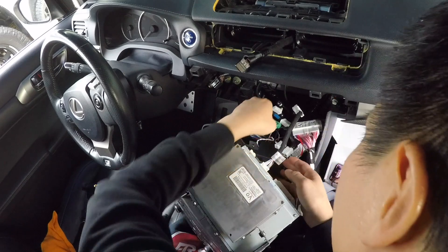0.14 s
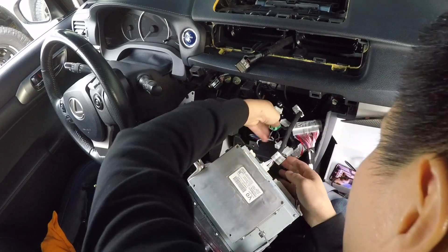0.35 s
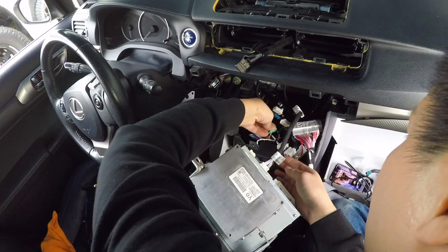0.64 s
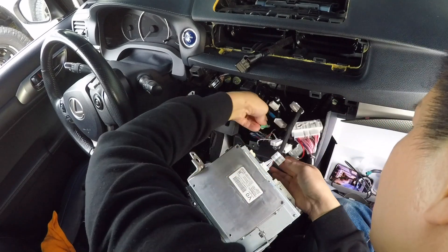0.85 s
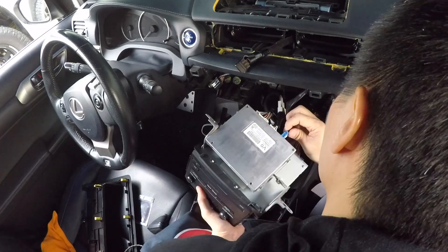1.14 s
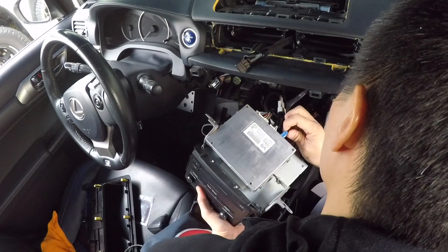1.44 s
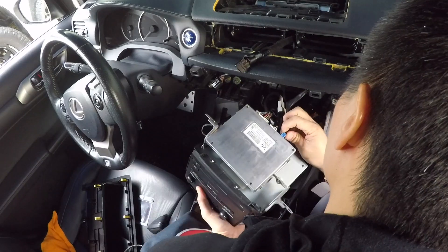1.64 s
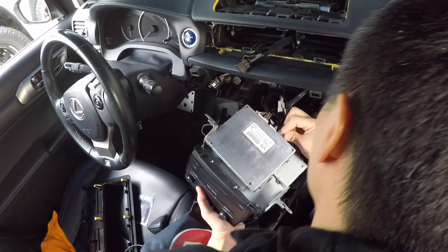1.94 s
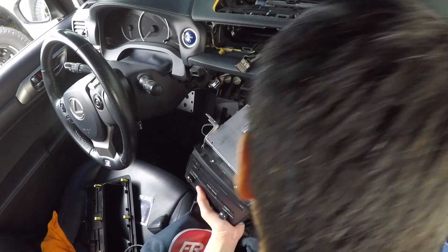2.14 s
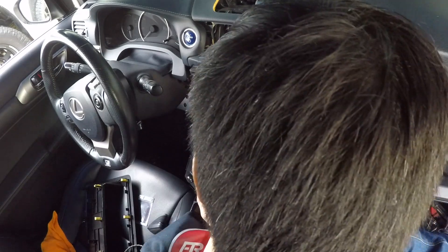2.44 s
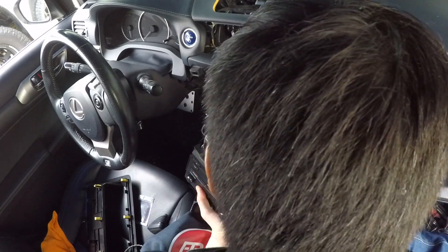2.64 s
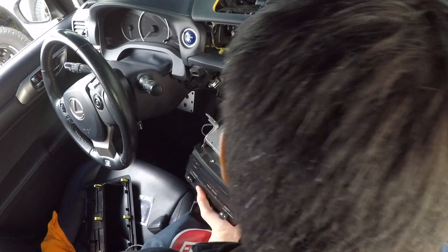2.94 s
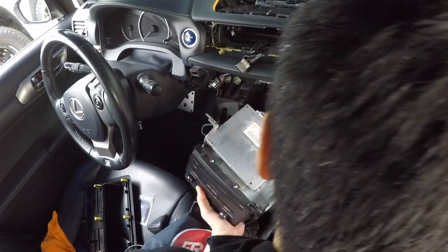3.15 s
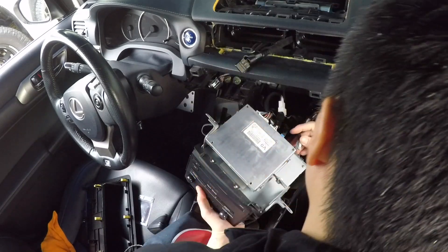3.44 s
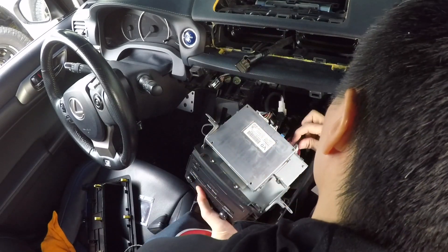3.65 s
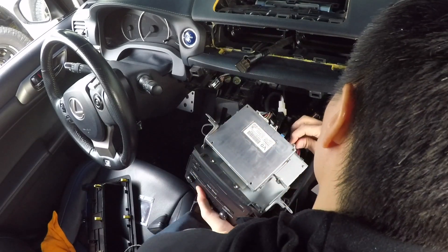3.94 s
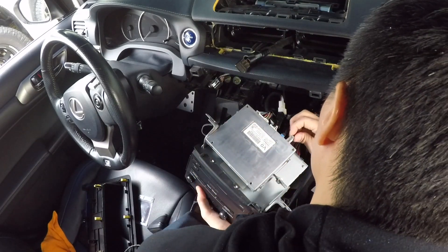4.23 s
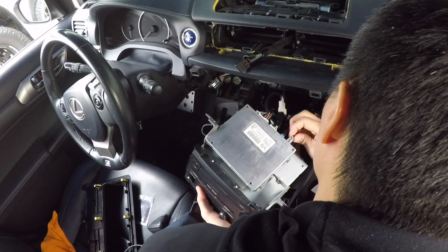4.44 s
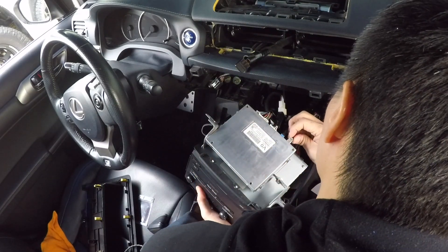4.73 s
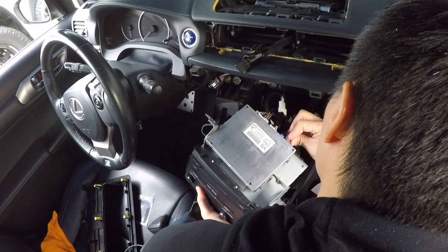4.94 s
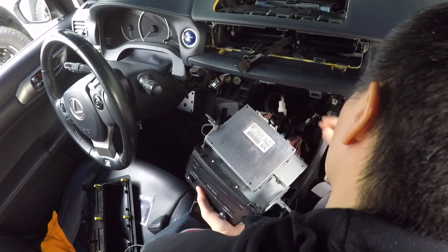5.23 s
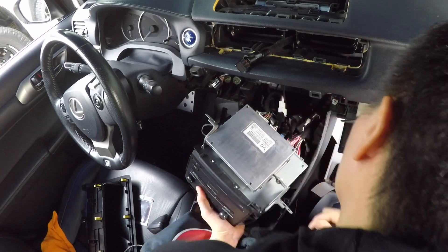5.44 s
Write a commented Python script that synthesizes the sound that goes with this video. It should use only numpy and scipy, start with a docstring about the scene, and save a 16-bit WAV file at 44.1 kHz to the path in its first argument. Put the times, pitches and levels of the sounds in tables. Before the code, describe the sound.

Plastic connector latches snap sharply into a metal electronics case that rings faintly, with scrapes, knocks and cloth rustle in a quiet car cabin.

```python
"""Latches snap and set a sheet-metal case ringing, the case knocks and scrapes, sleeves and cables rustle.
Hands are plugging plastic connectors into an electronics case inside a parked car, over a quiet low
background, in a small padded cabin, heard through a close pair of microphones.
Snaps and hisses are shaped noise, rings are decaying sines, and a dense noise tail echoes the handling."""
import sys
import numpy as np
from scipy import signal
from scipy.fft import rfft, irfft
from scipy.io import wavfile
from scipy.ndimage import uniform_filter1d

SR = 44100
rng = np.random.default_rng(int(sys.argv[2]) if len(sys.argv) > 2 else 0)


def put_to_file(sound):
    """Save the sound as 16-bit audio at rate SR, in the file named by the first command-line argument."""
    columns = np.atleast_2d(sound).T  # one column per channel
    safe = np.clip(columns, -1, 1)
    whole_steps = np.round(safe * 32767)
    wavfile.write(sys.argv[1], SR, whole_steps.astype(np.int16))


def volts_from_db(level):
    """Convert decibel levels to linear amplitude ratios."""
    exponent = np.asarray(level, float) / 20
    return 10 ** exponent


N = 245763  # length in samples


def evened(x):
    """Scales to rms 1."""
    return x / np.sqrt(np.mean(x ** 2) + 1e-20)


def read(points, hz):
    """Reads a table at the frequencies hz, straight between points on a log frequency axis."""
    f, value = np.transpose(points)
    return np.interp(np.log(hz + 1), np.log(f + 1), value)


def add(mix, start_s, sound, pan_db=0):
    """Places a sound in both channels; positive pan_db leans left."""
    part = mix[:, round(start_s * SR):][:, :sound.shape[-1]]
    part += sound[..., :part.shape[1]] * volts_from_db(np.array([[pan_db / 2], [-pan_db / 2]]))


def ring(modes, weights, size):
    """Decaying sines; weights scale each mode and set its sign."""
    t = np.arange(size) / SR
    return sum(weight * volts_from_db(db - 60 * t / t60) * np.sin(2 * np.pi * hz * t)
               for (hz, db, t60), weight in zip(modes, weights))


def wobble(size, seconds):
    """Slow random curve of rms 1, from noise through a one-pole smoother."""
    settled = signal.lfilter([1], [1, -np.exp(-1 / (seconds * SR))], rng.standard_normal(size + SR))[SR:]
    return evened(settled)


# how far the two microphones differ at each pitch: [pitch_hz, side_over_mid_db]
MIC_DIFFERENCE = [(60, -37.5), (150, -18), (380, -19), (950, -11), (2380, -5), (5980, 2), (15000, 0)]


def pair(a, b, hz):
    """Two channels from spectra a and b, alike in the bass and apart in the treble."""
    side = b * volts_from_db(read(MIC_DIFFERENCE, hz))
    return np.array([a + side, a - side])


def noise(spectrum, patchy_db, flicker_db):
    """Stereo noise in short frames with random patches and a flicker shared by all bands; mid rms 1."""
    frames = N // 128 + 6
    a, b, c, d, patches = rng.standard_normal((frames, 257, 5)).T
    patches = evened(uniform_filter1d(uniform_filter1d(patches, 16, 0), 10, 1))
    flicker = evened(uniform_filter1d(rng.standard_normal(frames), 6))
    z = np.array([a + 1j * b, c + 1j * d]) * volts_from_db(patchy_db * patches + flicker_db * flicker)
    white = signal.istft(z, nperseg=512, noverlap=384)[1][:, :N]
    hz = np.fft.rfftfreq(N, 1 / SR)
    x = irfft(pair(*(rfft(white) * volts_from_db(read(spectrum, hz))), hz), N)
    return x / np.std(x.mean(0))


# low background of the car: [pitch_hz, relative level_db per Hz]
BACKGROUND = [(18, -30), (30, 0), (48, -7), (111, -8), (178, -17.5), (361, -21), (457, -27.5), (928, -27.5),
              (1210, -30), (5360, -41.5), (7950, -41.5), (12700, -44), (15700, -53.5)]
BACKGROUND_DB = -59


def background():
    """Steady low noise with a slight flicker."""
    return volts_from_db(BACKGROUND_DB) * noise(BACKGROUND, patchy_db=0.16, flicker_db=2.5)


# levels of cloth and hands: [start_s, cloth and cable hiss level_db, muffled handling level_db]
RUSTLE_LEVELS = [(0.0, -60, -62.5), (0.28, -67, -61), (0.46, -68.5, -60.5), (0.71, -63.5, -62),
                 (0.91, -64, -59), (1.68, -71, -68), (1.92, -64, -65.5), (2.65, -67.5, -57.5),
                 (2.79, -66, -66.5), (2.95, -70.5, -69), (3.5, -71, -67.5), (3.79, -61.5, -67),
                 (3.94, -83, -70), (4.16, -78.5, -71.5), (4.67, -69.5, -67), (5.24, -67, -64.5),
                 (5.37, -59, -63), (5.57, -69, -69)]
# colour of cloth and cables: [pitch_hz, relative level_db per Hz]
CLOTH_COLOUR = [(880, -22), (1500, -4.5), (2220, -1.5), (3220, -5), (3450, -7.5), (9650, -3.5),
                (15600, -17.5)]
# colour of hands on the case: [pitch_hz, relative level_db per Hz]
HANDLING_COLOUR = [(35, -24.5), (60, 8.5), (140, -14), (306, -1.5), (440, -11.5), (532, -7), (1500, -18),
                   (1950, -44.5), (3300, -120)]
SLIPS_PER_S, SLIP_DECAY_S = 120, 0.013


def rustle():
    """Cloth and cables hiss and crackle; hands on the case make a muffled rumble."""
    start_s, hiss_db, rumble_db = np.transpose(RUSTLE_LEVELS)
    t = np.arange(N) / SR
    slips = (rng.random(N) < SLIPS_PER_S / SR) * volts_from_db(1.7 * np.minimum(rng.exponential(1, N), 4))
    # each fibre slip flares and dies
    crackle = 1 + 0.18 * signal.lfilter([1], [1, -np.exp(-1 / (SLIP_DECAY_S * SR))], slips)
    cloth = evened(crackle * noise(CLOTH_COLOUR, patchy_db=4.5, flicker_db=-2.0))
    handling = noise(HANDLING_COLOUR, patchy_db=1.0, flicker_db=2.5)
    return volts_from_db(np.interp(t, start_s, hiss_db)) * cloth + volts_from_db(np.interp(t, start_s, rumble_db)) * handling


# resonances of the rubbed metal: [pitch_hz, width_hz, relative level_db]
SCRAPED_MODES = [(922, 48, -1), (1650, 20, 1), (2770, 126, -8), (3595, 59, -4.5), (3856, 40, 2),
                 (5270, 240, -6.5), (9260, 110, -4.5), (11700, 64, -4.5), (12700, 67, -17),
                 (13300, 83, -24), (13600, 130, -36), (15000, 62, -20)]
# the drag starts, bites, lets go, settles, stops; levels are relative to an rms of 2
SCRAPE_S = (0, 0.13, 0.275, 0.3, 0.45)
SCRAPE_DB = (-87, -62.5, -57, -66.5, -71)
WAVER_DB, WAVER_S = 2.5, 0.036  # each rubbed resonance comes and goes; depth before smoothing


def scrape():
    """Fine friction drives the resonances of the rubbed metal over a diffuse hiss."""
    t = np.arange(0, 0.47, 1 / SR)
    roughness = evened(uniform_filter1d(rng.standard_normal(len(t)), 200))
    grit = rng.standard_normal((2, len(t))) * volts_from_db(2 * roughness)
    hz = np.fft.rfftfreq(len(t), 1 / SR)
    body = volts_from_db(-22) * rfft(grit)  # the diffuse hiss
    for mode_hz, width_hz, db in SCRAPED_MODES:
        waver_db = WAVER_DB * uniform_filter1d(wobble(len(t), WAVER_S), size=400)
        body = body + rfft(grit * volts_from_db(db + waver_db)) / (1 + 1j * (hz - mode_hz) / width_hz)
    drag = volts_from_db(np.interp(t, SCRAPE_S, SCRAPE_DB, right=-99))
    out = np.zeros((2, N))
    add(out, 0, drag * 2 * evened(irfft(pair(*body, hz), len(t))))
    return out


# colour of cracking plastic: [pitch_hz, relative level_db per Hz]
CRACK_COLOUR = [(400, -29.5), (1200, -11), (1800, 5.5), (3000, 1), (6000, -2), (10000, -1.5), (13000, -4),
                (16500, -7)]


def burst(grit, centre_hz, width):
    """Stereo plastic noise with a peak at centre_hz over the crack colour; mid rms 1."""
    size = grit.shape[1]
    hz = np.fft.rfftfreq(size, 1 / SR)
    colour = volts_from_db(read(CRACK_COLOUR, hz)) * (0.19 + 1 / (1 + ((hz / centre_hz - 1) / width) ** 2))
    x = irfft(pair(*(rfft(grit) * colour * [[1], [0.6]]), hz), size)
    return x / np.std(x.mean(0))


# modes of the sheet-metal case: [pitch_hz, relative level_db, t60_s]
CASE_MODES = [(490, -15, 0.24), (522.4, -12.5, 0.21), (777, -16, 0.17), (874, -8, 0.17), (930, -14, 0.16),
              (1306, -17.5, 0.23), (1676, -15, 0.41), (1870, -11, 0.44), (1966, -5.5, 0.22),
              (2070, -20.5, 0.31), (2155, -14, 0.35), (2330, -4, 0.083), (2519, -12.5, 0.268),
              (2595, -13, 0.17), (2690, -19, 0.45), (3171, -25, .25), (3440, -22, .12),
              (3480, -16.5, 0.316), (3590, -27, .22), (4060, -11, .2), (4300, -6, 0.081), (5200, -22, 0.21)]
CASE_OCTAVES = np.log2(np.transpose(CASE_MODES)[0] / 1900)  # pitch in octaves from 1900 Hz
BUZZ, BUZZ_S = 0.25, 0.013  # share of roughness, grain in s


def case_ring(weights, size):
    """The sheet metal rings in its modes; loose brackets roughen the ring."""
    return ring(CASE_MODES, weights, size) * (1 - BUZZ + BUZZ * wobble(size, BUZZ_S))


# latch clicks: [start_s, level_db, snap pitch_hz, housing level_db, case level_db],
# the last two relative to the click's own level
LATCH_CLICKS = [(0.406, -42.5, 7500, -32, -23), (0.6518, -40, 9500, -34, -29.5),
                (0.6749, -38.5, 11800, -28, -22), (1.0125, -49, 5260, -6.5, -10),
                (1.1219, -42, 5230, -15, -35), (1.1764, -34, 7500, -9.5, -48),
                (1.2505, -45.5, 6500, -31, -29), (1.371, -35, 6100, -0.5, -11),
                (1.4834, -59.5, 4150, 6, -17), (1.8368, -41, 9210, -4, -14.5),
                (1.8488, -13.5, 9500, -6, -24.5), (1.9304, -48.5, 8900, -5, -38),
                (1.9892, -53.5, 5760, 2.5, -10), (2.2405, -37.5, 10100, -16.5, -26.5),
                (2.4042, -33.5, 6160, -23, -40), (2.4454, -38, 5300, -19.5, -23),
                (2.5741, -14.5, 5830, -22, -65), (2.7094, -43.5, 4700, -43, -39),
                (2.9301, -47.5, 7450, -20, -42), (3.64, -48.5, 7750, -30, -24),
                (3.835, -49, 6980, -24, -24), (3.8487, -51, 6600, -3, -13), (3.9043, -44, 7600, -30, -30),
                (3.9178, -47.5, 7600, -32, -33), (4.2918, -41.5, 3840, -8.5, -13),
                (4.783, -42, 8150, -16, -30), (4.916, -46, 8000, -14, -24), (4.989, -48, 7000, -8, -22),
                (5.0083, -15, 10800, -24, -31), (5.0586, -26.5, 9350, -15.5, -30),
                (5.181, -48.5, 4250, -11, -14.5), (5.2345, -14, 8560, -13.5, -37)]
# modes of the plastic housing: [pitch_hz, relative level_db, t60_s]
HOUSING_MODES = [(1920, -2, .028), (2180, -10, .025), (2480, 0, .03), (3300, -12, .018)]
# where the fingers work: [start_s, left over right level_db]
FINGER_PLACE = [(0, 2), (1.4, 3.5), (1.85, -2), (2.57, 3), (5.0, -1), (5.06, 10.5), (5.23, 1)]
# loose plugs touch at random; TICK_DB is the faintest, TICK_HZ the middle pitch
TICKS_PER_S, TICK_DB, TICK_SPREAD_DB, TICK_HZ = 4, -56.5, 3, 7000
TICK_HOUSING_DB, TICK_CASE_DB = -20, -25


def clicks():
    """A latch snaps: a crack of a few ms, its plastic housing rings briefly, the metal case rings on."""
    out, t = np.zeros((2, N)), np.arange(3072) / SR
    draws = rng.random((int(TICKS_PER_S * N / SR), 3))
    ticks = [(when * N / SR, TICK_DB - TICK_SPREAD_DB * np.log(1 - force), TICK_HZ * (0.5 + pitch),
              TICK_HOUSING_DB, TICK_CASE_DB) for when, force, pitch in draws]
    events = list(LATCH_CLICKS) + ticks
    chance = rng.standard_normal((len(events), 2, 3072))
    shape = np.minimum(t / 0.00014, 1) * (volts_from_db(-60 * t / 0.0092) + 0.22 * volts_from_db(-60 * t / 0.049))
    swell = np.minimum(np.arange(3000) / SR / 0.00087, 1)  # the housing takes a moment to start
    modes = len(CASE_MODES)
    for (start_s, db, snap_hz, housing_db, case_db), grit in zip(events, chance):
        pan_db = np.interp(start_s, *np.transpose(FINGER_PLACE))
        crack = 0.6 * shape * burst(grit, snap_hz, 0.26)
        add(out, start_s, volts_from_db(db) * crack, pan_db)
        housing = swell * ring(HOUSING_MODES, [1, -1, 1, -1] * volts_from_db(grit[1, :4]), size=3000)
        add(out, start_s, volts_from_db(db + housing_db) * housing, pan_db / 4)
        # light blows favour the low modes
        tilt_db = 0.24 * (db + 14.5) * CASE_OCTAVES + 1.5 * grit[0, :modes]
        metal = case_ring(np.sign(grit[1, :modes]) * volts_from_db(tilt_db), size=20000)
        add(out, start_s, volts_from_db(db + case_db) * metal)
    return out


# a plug slides in its socket: [start_s, length_s, level_db, hiss pitch_hz, case level_db over the hiss]
PLUG_RUBS = [(0.741, 0.024, -60.5, 4970, -7), (1.002, 0.13, -63, 5070, -29), (1.541, 0.061, -63, 6150, 2),
             (1.68, .15, -76, 8100, 15), (2.058, 0.043, -57, 6200, 3), (2.451, 0.032, -56.5, 5500, -19),
             (2.514, 0.083, -54.5, 6040, -33), (2.768, 0.026, -63.5, 4960, -6),
             (3.211, 0.075, -62, 8100, -24), (4.585, 0.023, -62.5, 3700, 4),
             (4.758, 0.024, -67.5, 5100, -8), (5.002, 0.022, -46.5, 5970, -3),
             (5.166, 0.027, -55, 7200, -21)]
RUB_RISE = 0.45  # share of a slide spent rising


def rubs():
    """Sliding plastic hisses unevenly, and the same grit shakes the case."""
    out = np.zeros((2, N))
    case = case_ring(volts_from_db(-3 * CASE_OCTAVES + 2 * rng.standard_normal(len(CASE_MODES))), size=12000)
    for start_s, length_s, db, hz, case_db in PLUG_RUBS:
        grit = rng.standard_normal((3, 16384))
        u = np.arange(round(length_s * SR)) / (length_s * SR)
        unevenness = volts_from_db(3.9 * evened(uniform_filter1d(grit[2], 130)))[:len(u)]
        push = np.minimum(u / RUB_RISE, (1 - u) / (1 - RUB_RISE)) * unevenness
        add(out, start_s, volts_from_db(db) * push * burst(grit[:2], hz, 0.5)[:, :len(u)])
        shaken = signal.fftconvolve(push * grit[0, :len(u)], case) / np.linalg.norm(case)
        add(out, start_s, volts_from_db(db + case_db) * shaken)
    return out


# dull knocks of case and knuckles on the trim: [start_s, level_db, pitch_hz, rattle t60_s]
DULL_KNOCKS = [(0.75, -39.5, 537, 0.1), (0.812, -42.5, 288, 0.17), (0.843, -45.5, 316, 0.064),
               (1.004, -41.5, 151, 0.073), (1.172, -34.5, 564, 0.032), (2.142, -27.5, 288, 0.058),
               (2.169, -37.5, 293, 0.051), (2.198, -42, 149, 0.25), (2.474, -36.5, 214, 0.11),
               (2.575, -35, 310, 0.082), (2.775, -41.5, 317, 0.062), (3.093, -43, 410, 0.11),
               (3.845, -42.5, 490, 0.14), (4.142, -46, 210, 0.23), (5.232, -22, 231, 0.075)]
# modes of the hollow console trim: [pitch_hz, relative level_db, t60_s]
CONSOLE_MODES = [(102.8, 0.5, 0.16), (249, -11, 0.18), (332, -10, 0.1), (585, 0, 0.03), (890, -5, 0.052),
                 (1058, 2.5, 0.034)]
BUMP_S, BUMP_DB = 5.2345, -28  # the case is set against the console


def knocks():
    """Soft blows: a short damped low mode and a broad loose rattle, and the console boom."""
    out, t = np.zeros((2, N)), np.arange(12000) / SR
    rise, every_hz = np.minimum(t / 0.0032, 1), np.fft.rfftfreq(12000, 1 / SR)
    for start_s, db, hz, t60 in DULL_KNOCKS:
        blow = ring([(hz, db, 0.035), (1.76 * hz, db - 21.5, 0.03)], [1, -1], size=12000)
        band = np.exp(-(np.log(every_hz / hz + 1e-9) / 0.84) ** 2)
        rattle = evened(irfft(rfft(rng.standard_normal(12000)) * band, 12000))
        add(out, start_s, rise * (blow + rattle * volts_from_db(db - 10 - 60 * t / max(t60, 0.01))))
    boom = ring(CONSOLE_MODES, np.ones(len(CONSOLE_MODES)), size=12000)
    add(out, BUMP_S, volts_from_db(BUMP_DB) * rise * boom)
    return out


# small hollow pops off to the right:
# [start_s, level_db before a gain of 1.5, pitch_hz, left over right level_db]
HOLLOW_POPS = [(2.2165, -57, 1310, -20), (2.335, -50.5, 1300, -16), (2.985, -50.5, 1340, -12),
               (3.813, -56, 1330, -14), (5.315, -52, 1310, -19)]


def pops():
    """Short hollow blips off to the right, each one fast-decaying sine."""
    out = np.zeros((2, N))
    rise = np.minimum(np.arange(2000) / SR / 0.00033, 1)
    for start_s, db, hz, pan_db in HOLLOW_POPS:
        add(out, start_s, rise * ring([(hz, db, 0.022)], [1.5], size=2000), pan_db)
    return out


# colour of the sleeve: [pitch_hz, relative level_db per Hz]
SLEEVE_COLOUR = [(590, -37), (1000, -13), (1060, -11), (1320, 1), (2200, -1), (3190, -11), (3460, -8.5),
                 (9600, 0), (16000, -15)]
SWISH_S, SWISH_DB = (5.24, 5.42, 5.66), (-65.5, -54.5, -65)  # the sleeve starts, is fullest, fades


def swish():
    """The sleeve sweeps away: smooth cloth noise that swells and fades."""
    level = volts_from_db(np.interp(np.arange(N) / SR, SWISH_S, SWISH_DB, left=-99))
    return level * noise(SLEEVE_COLOUR, patchy_db=1.5, flicker_db=0.7)


# decay of the padded cabin: [pitch_hz, t60_s]
CABIN_DECAY = [(300, 0.12), (1500, 0.03), (5000, 0.035), (14000, 0.011)]


def cabin(x):
    """Dense reflections from glass and trim, each band dying at its own speed."""
    hz, t, z = signal.stft(rng.standard_normal((2, 8192)), SR, nperseg=128)
    decay = volts_from_db(-60 * t / read(CABIN_DECAY, hz)[:, None])
    tail = signal.istft(pair(*z, hz[:, None]) * decay, SR, nperseg=128)[1]
    tail = np.pad(tail, ((0, 0), (60, 0)))  # samples: the nearest panel is half a metre further
    return signal.fftconvolve(x.mean(0)[None], tail / np.linalg.norm(tail[0]), axes=1)[:, :N]


def scene():
    """Handling sounds with their cabin echo over the background."""
    hands = scrape() + clicks() + rubs() + knocks()
    echo = volts_from_db(-5.5) * cabin(hands)
    return background() + rustle() + hands + echo + pops() + swish()


def low_pass(x):
    """Removes everything above the highest recorded frequency."""
    return signal.sosfilt(signal.butter(12, 17000, fs=SR, output="sos"), x)


OFFSET = -0.0016  # constant shift from the converter, full scale 1
BASS_CUT_HZ, EDGE_HZ = 43, 16600


def record(dry):
    """Bass cut of the microphones, band limit, converter offset."""
    bass_cut = signal.butter(3, BASS_CUT_HZ, "highpass", fs=SR, output="sos")
    x = signal.sosfilt(bass_cut, dry)
    band_limit = signal.firwin(255, EDGE_HZ, window=("kaiser", 9), fs=SR)
    x = signal.oaconvolve(x, band_limit[None], "same")
    return low_pass(x + OFFSET)


dry = scene()
out = record(dry)
put_to_file(out)
```